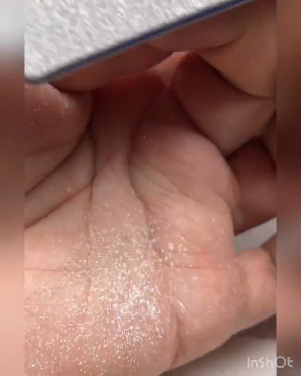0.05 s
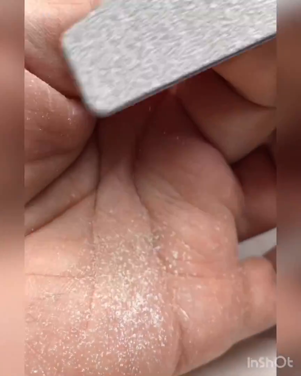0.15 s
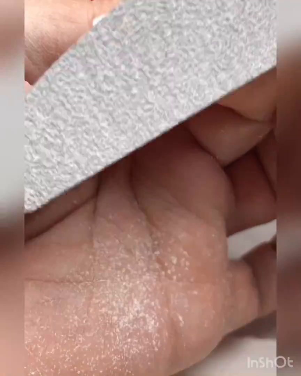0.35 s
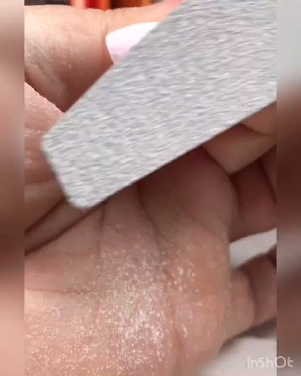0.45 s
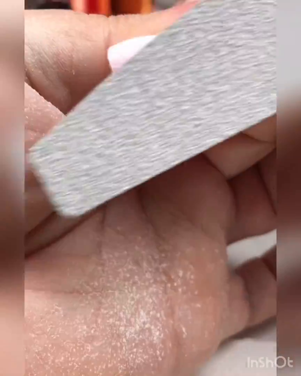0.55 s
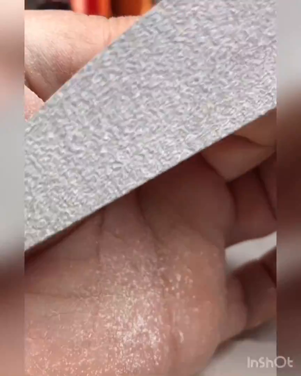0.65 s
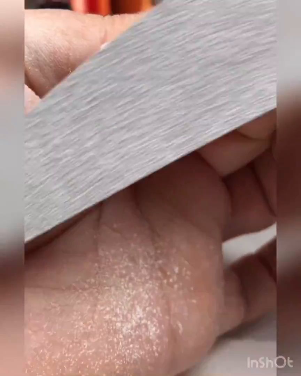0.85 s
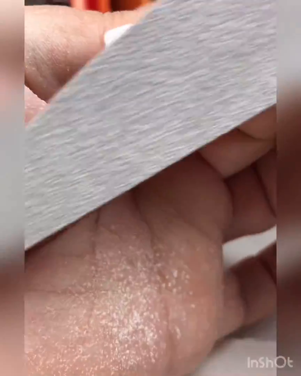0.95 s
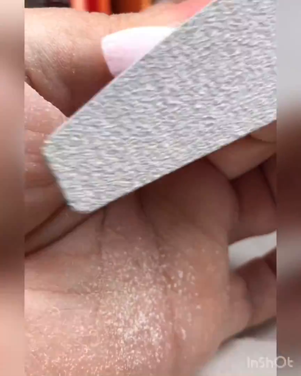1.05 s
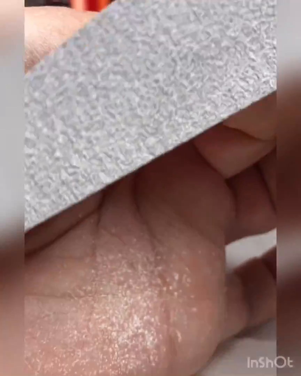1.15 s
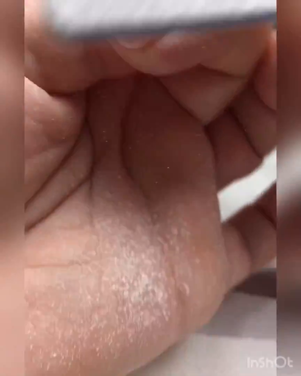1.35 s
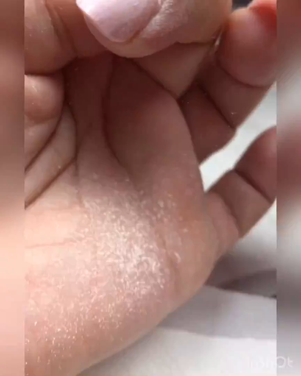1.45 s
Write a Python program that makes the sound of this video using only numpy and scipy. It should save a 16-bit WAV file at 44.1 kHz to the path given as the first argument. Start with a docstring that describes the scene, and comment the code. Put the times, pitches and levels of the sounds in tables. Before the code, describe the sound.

Quick, gritty back-and-forth scraping of a hand file on a fingernail indoors.

```python
"""A small room, close up: an abrasive nail file rasps to and fro over a fingernail.
Nine quick strokes grow harder and brighter; grit ticks ring the file and the nail, a little
differently each way, and the fingers thrum and bump under the file. Coarse grains snag, the
nail's edge squeaks briefly, and at the end the file slides off lightly."""
import sys
import numpy as np
from scipy import signal
from scipy.io import wavfile

SR = 44100
rng = np.random.default_rng(int(sys.argv[2]) if len(sys.argv) > 2 else 0)


def int16_out(signal):
    """Quantize to a 16-bit WAV file."""
    q = np.round(np.clip(np.atleast_2d(signal).T, -1, 1) * 32767)
    wavfile.write(sys.argv[1], SR, q.astype(np.int16))


N = 66150
T = np.arange(N) / SR
HZ = np.fft.rfftfreq(4096, 1 / SR)

# Spectra of light brushing, rasp and the fastest grit's fizz. Each row: frequency in Hz, gain in dB.
BRUSH_SPECTRUM = [(200, -13.5), (900, 3), (1600, 0), (2500, 2.5), (3900, 2), (5000, -1.5), (6000, -1.5),
                  (8000, -2.5), (10000, -5), (12000, -5), (16000, -9)]
RASP_SPECTRUM = [(150, -14.5), (500, -7.5), (900, -0.5), (1600, -7), (2300, -1), (4000, -0.5), (7000, -1),
                 (9000, -0.5), (10500, -1.5), (13000, 0.5), (16000, 0.5)]
FIZZ_SPECTRUM = [(3000, -30), (8000, -11.5), (10200, -15.5), (11700, -5), (12700, -18), (13400, -6),
                 (14500, -7), (15300, -1), (15900, -2)]
# Weaker resonances on push and pull. Each row: centre in Hz, width in Hz, lift in dB (sign ignored).
PUSH_RINGS = [(1957, 420, 9), (4134, 380, 6.5), (6360, 380, 6), (7180, 400, 4.5), (8300, 600, -1),
              (11850, 690, 5), (12700, 400, 2.5), (15200, 700, -0.5)]
PULL_RINGS = [(1055, 320, 8.1), (2100, 300, 1.2), (4200, 550, 5.1), (6120, 400, 4.9), (8400, 400, 2),
              (11920, 720, 4.9), (12850, 410, 4), (14300, 700, 2)]


def amp(db):
    """Decibels to gain."""
    return 10 ** (np.asarray(db) / 20)


def unit(x):
    """Scales to rms 1."""
    return x / np.sqrt(np.mean(x ** 2) + 1e-20)


def level(points):
    """Gain over time from (s, dB) points."""
    return amp(np.interp(T, *np.transpose(points)))


def swell(centre_s, half_s):
    """Gaussian envelope."""
    return np.exp(-((T - centre_s) / half_s) ** 2)


def colour(x, spectrum, rings=()):
    """Minimum-phase filter of unit energy: a broad spectrum lifted by resonances."""
    points_hz, points_db = np.transpose(spectrum)
    broad = amp(np.interp(np.log(HZ + 1), np.log(points_hz), points_db))
    ring_power = sum((amp(abs(lift_db)) ** 2 - 1) / (1 + (2 * (HZ - hz) / width_hz) ** 2) ** 2
                     for hz, width_hz, lift_db in rings)
    gain = broad * np.sqrt(1 + ring_power)
    log_gain = np.log(np.r_[gain, gain[-2:0:-1]])
    response = np.exp(np.conj(signal.hilbert(log_gain)))
    taps = np.fft.ifft(response).real[:len(HZ)]
    return signal.fftconvolve(x, taps / np.linalg.norm(taps))[:N]


def band(hz, width_hz):
    """A resonance shaken at random."""
    noise = rng.standard_normal(N) + 1j * rng.standard_normal(N)
    shake = signal.lfilter(*signal.butter(2, width_hz / 2, fs=SR), noise)
    return unit((shake * np.exp(2j * np.pi * hz * T)).real)


def clumps(depth_db, length_s):
    """Random swelling of the contact as patches of grit pass."""
    window = signal.windows.hann(max(3, int(2 * length_s * SR)))
    drift = unit(signal.fftconvolve(rng.standard_normal(N), window, "same"))
    return unit(amp(depth_db * drift))


def grit(per_s=21000, spread_db=1.9):
    """Dense ticks of uneven size, one for each grain that strikes."""
    size = amp(spread_db * np.minimum(rng.exponential(1, N), 4))
    return unit(size * rng.choice([-1, 1], N) * (rng.random(N) < per_s / SR))


def background():
    """Low room and handling noise."""
    # Each row: time in seconds, level in dB.
    levels = [(0, -60.5), (.35, -66.5), (.6, -61), (.85, -60), (1.05, -59.5), (1.3, -60), (1.5, -65.5)]
    # Each row: frequency in Hz, gain in dB.
    spectrum = [(20, -6.5), (38, -11), (53, 6), (70, 0.5), (120, -4), (250, -2.5), (500, -13.5),
                (1000, -18.5), (3000, -28), (8000, -43), (16000, -39)]
    return level(levels) * colour(rng.standard_normal(N), spectrum)


def brushing():
    """The file barely touches nail and skin, heard between strokes."""
    # Each row: time in seconds, level in dB.
    levels = [(0, -65), (.175, -70), (.21, -70), (.32, -75), (.36, -72), (.47, -66), (.62, -66), (.75, -66),
              (.87, -65), (1.0, -75), (1.13, -65.5), (1.245, -60.5), (1.35, -72), (1.5, -75.5)]
    contact = level(levels) * clumps(depth_db=1.5, length_s=0.004)
    return colour(contact * grit(per_s=7000, spread_db=2.5), BRUSH_SPECTRUM, PULL_RINGS)


def stroke(start_s, length_s, attack_s, fastest_at):
    """Contact and speed of one stroke, both 0-1; the speed arches over a falling ramp."""
    release_s, start_speed, end_speed = 0.005, 0.46, 0.12
    t = T - start_s
    contact = np.clip(t / attack_s, 0, 1) * np.clip((length_s - t) / release_s + 0.5, 0, 1)
    arch = np.sin(np.pi * np.interp(t / length_s, [0, fastest_at, 1], [0, 0.5, 1]))
    ramp = np.interp(t / length_s, [0, 1], [start_speed, end_speed])
    return contact, ramp + (1 - ramp) * arch ** 1.03


def filing():
    """Grit drags over the nail: rasp, fizz and dull finger thrum each follow a power of the speed."""
    # Push and pull in turn. Each row: start, length and attack in seconds, rasp and fizz in dB,
    # fastest point as a fraction of the length, nail ring in Hz, nail and file ring lifts in dB.
    strokes = [(0.02, 0.14, 0.015, -45.5, -57, 0.42, 2900, 8.5, 10.5),
               (0.211, 0.1, 0.0077, -41.5, -45, 0.26, 2950, 7.5, 11),
               (.366, 0.081, 0.0057, -42, -65, 0.47, 2830, 9.5, 12.5),
               (0.5022, 0.093, 0.0018, -39, -42.5, 0.61, 2920, 10, 12.5),
               (0.637, 0.09, 0.00084, -37.5, -42, 0.63, 2795, 11.5, 14),
               (0.766, 0.084, 0.0055, -38.5, -33.5, 0.46, 2940, 5.5, 14),
               (.896, 0.096, 0.0018, -39, -30.5, 0.5, 2890, 12, 13.5),
               (1.021, 0.093, 0.0093, -37.5, -30.5, 0.61, 2820, 5, 14),
               (1.1414, 0.091, 0.0051, -37, -26.5, 0.59, 2940, 11, 11.5)]
    # The file bounces and its grip changes. Each row: centre and half length in seconds, gain in dB.
    skips = [(0.0385, 0.0016, -16), (.2265, .003, -8), (0.378, 0.0046, -5.5), (0.64, 0.0039, -4),
             (0.904, 0.0023, 2.5)]
    # Each row: frequency in Hz, gain in dB.
    thrum_spectrum = [(30, -18), (80, -2.5), (150, -3), (260, -3.5), (450, -2.5), (850, -4.5), (1500, -6),
                      (3000, -48.5)]
    nail_width_hz, file_hz, file_width_hz = 460, 4885, 457
    mean_rasp_db = np.mean([row[3] for row in strokes])
    grip = amp(sum(db * swell(centre_s, half_s) for centre_s, half_s, db in skips))
    bite = clumps(depth_db=1.53, length_s=0.0016) * grip
    coarse, fine = bite * grit(), bite * grit()
    scrape, thrum_gain = np.zeros(N), np.zeros(N)
    for k, row in enumerate(strokes):
        start_s, length_s, attack_s, rasp_db, fizz_db, fastest_at, nail_hz, nail_db, file_db = row
        contact, speed = stroke(start_s, length_s, attack_s, fastest_at)
        main_rings = [(nail_hz, nail_width_hz, nail_db), (file_hz, file_width_hz, file_db)]
        rings = [PUSH_RINGS, PULL_RINGS][k % 2] + main_rings
        rasp = colour(amp(rasp_db) * contact * speed ** 0.91 * coarse, RASP_SPECTRUM, rings)
        fizz = colour(amp(fizz_db) * contact * speed ** 1.48 * fine, FIZZ_SPECTRUM, rings)
        scrape += palm(rasp + fizz)
        thrum_db = -56 + 0.23 * (rasp_db - mean_rasp_db)
        thrum_gain += amp(thrum_db) * contact * speed ** 0.38
    return scrape + colour(thrum_gain * bite * rng.standard_normal(N), thrum_spectrum)


def palm(x):
    """Adds one reflection from the cupped hand, over a path that varies by stroke."""
    delay_s = rng.uniform(0.0005, 0.0016)
    return x + 0.2 * np.roll(x, int(delay_s * SR))


def snags(crack_gain=1.4, decay_s=0.0008):
    """A coarse grain catches with a tiny crack, then crumbles."""
    # Each row: start in seconds, force level in dB.
    grains = [(.0418, -33), (.091, -33.5), (0.1206, -33.5), (0.257, -29.5), (0.4378, -37), (.800, -33),
              (1.1992, -31)]
    # Each row: centre in Hz, width in Hz, lift in dB.
    rings = [(2940, 450, 6), (4500, 2100, 7.5), (11300, 790, 11.5)]
    crumble = sum(amp(db) * (T >= start_s) * np.exp(-abs(T - start_s) / decay_s)
                  for start_s, db in grains)
    force = crumble * rng.choice([-1, 1], N)
    for start_s, db in grains:
        force[int(start_s * SR)] += crack_gain * amp(db)
    return colour(force, RASP_SPECTRUM, rings)


def bumps():
    """The fingers give softly under the file."""
    # Each row: centre and half length in seconds, level in dB, frequency in Hz.
    events = [(0.09, 0.031, -60.5, 180.8), (0.422, .02, -60, 275), (0.695, .025, -52.5, 280),
              (.86, 0.032, -60, 148), (0.976, 0.0091, -51.5, 280), (1.211, 0.032, -57, 250)]
    return sum(amp(db) * swell(centre_s, half_s) * band(hz, width_hz=183)
               for centre_s, half_s, db, hz in events)


def squeaks():
    """The nail's edge chatters for a moment in its high resonance, with a spray of fizz."""
    # Each row: centre and half length in seconds, resonance level in dB, frequency in Hz.
    events = [(0.9484, 0.0036, -26.5, 12100), (1.173, 0.00275, -34.5, 12120), (1.196, .007, -36.5, 12000)]
    spray = amp(-1) * colour(grit(), FIZZ_SPECTRUM)
    return sum(amp(db) * swell(centre_s, half_s) * (band(hz, width_hz=1900) + spray)
               for centre_s, half_s, db, hz in events)


def graze(peak_s, db, decay_s, rise_s=0.0037):
    """Grit that sets in quickly and fades."""
    rise = np.clip((T - peak_s) / rise_s + 1, 0, 1)
    fade = np.exp(-np.maximum(T - peak_s, 0) / decay_s)
    return amp(db) * rise * fade * grit()


def slide_off():
    """A last light touch on the nail, then a duller swish as the file leaves."""
    # Each row: frequency in Hz, gain in dB.
    swish_spectrum = [(300, 3.5), (1000, 4.5), (2500, 3), (4500, -0.5), (5500, -5), (9000, -2.5),
                      (10500, -26), (16000, -24)]
    # Each row: centre in Hz, width in Hz, lift in dB.
    swish_rings = [(3780, 1600, 12.5), (8300, 650, 5)]
    touch = colour(graze(peak_s=1.2565, db=-47.5, decay_s=0.011), BRUSH_SPECTRUM, PUSH_RINGS)
    swish = colour(graze(peak_s=1.27, db=-52, decay_s=0.034), swish_spectrum, swish_rings)
    return touch + swish


def room(x, db=-25, t60_s=0.28, predelay_s=0.004, cutoff_hz=6000):
    """A faint short tail from nearby walls."""
    t = T[:SR // 2]
    tail = rng.standard_normal(len(t)) * amp(-60 * t / t60_s) * (t > predelay_s)
    tail = signal.lfilter(*signal.butter(1, cutoff_hz, fs=SR), tail)
    return amp(db) * signal.fftconvolve(x, tail / np.linalg.norm(tail))[:N]


def scene():
    """The file in its room over a low background, mono."""
    direct = filing() + snags() + squeaks() + brushing() + slide_off() + bumps()
    return (direct + background() + room(direct))[None]


def record(dry):
    """Low cut and steep band limit."""
    low_hz, high_hz = 41.5, 15900
    highpass = signal.butter(6, low_hz, "highpass", fs=SR, output="sos")
    lowpass = signal.firwin(511, high_hz, window=("kaiser", 9), fs=SR)
    return signal.oaconvolve(signal.sosfilt(highpass, dry), lowpass[None], "same")


dry = scene()
out = record(dry)
int16_out(out)
```